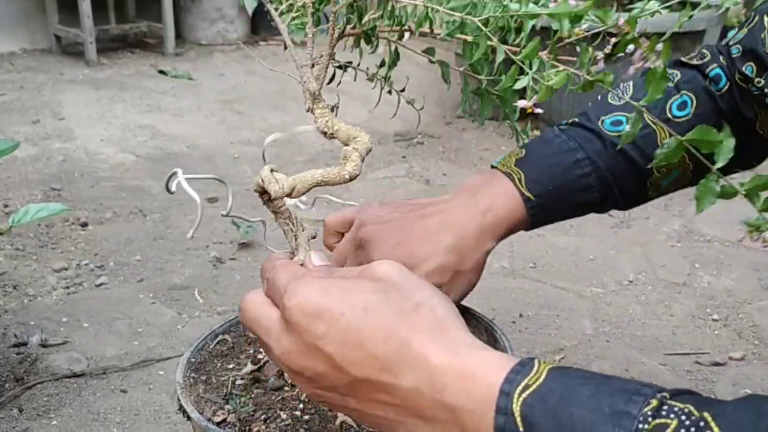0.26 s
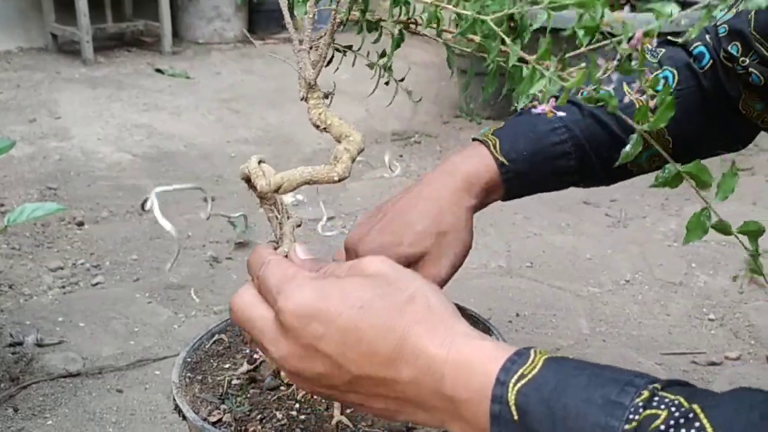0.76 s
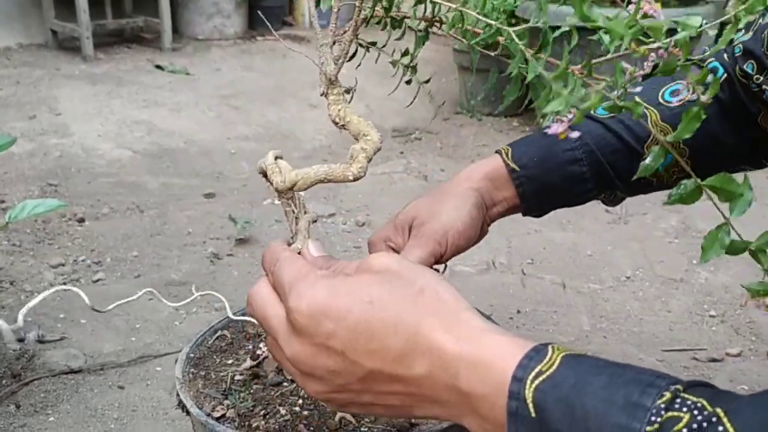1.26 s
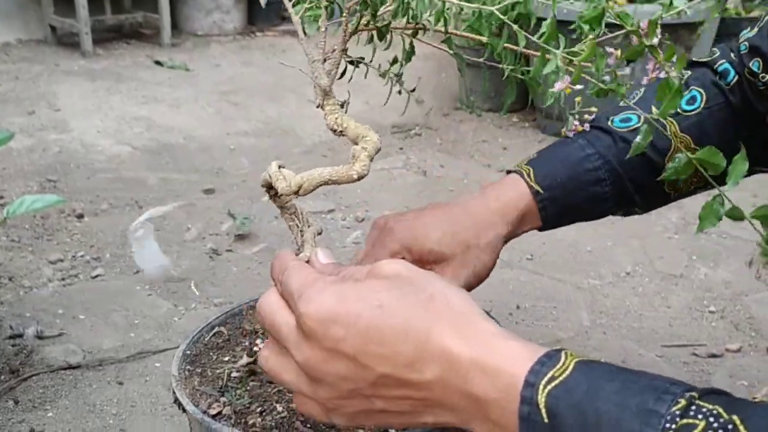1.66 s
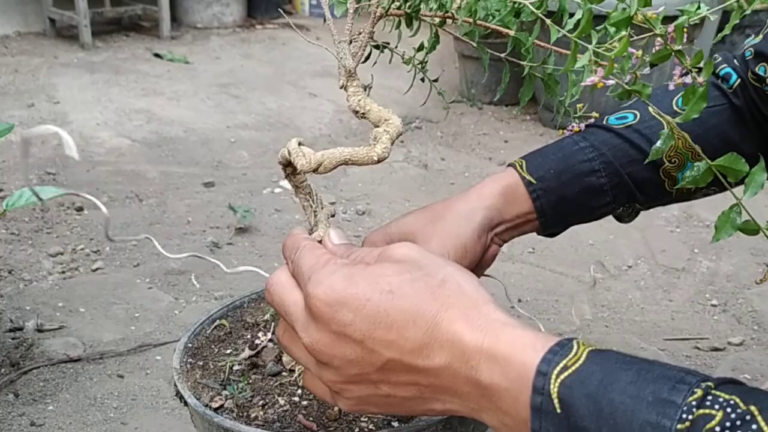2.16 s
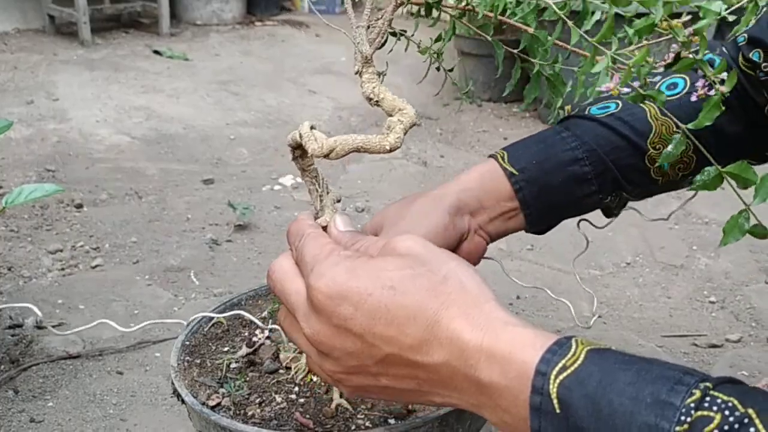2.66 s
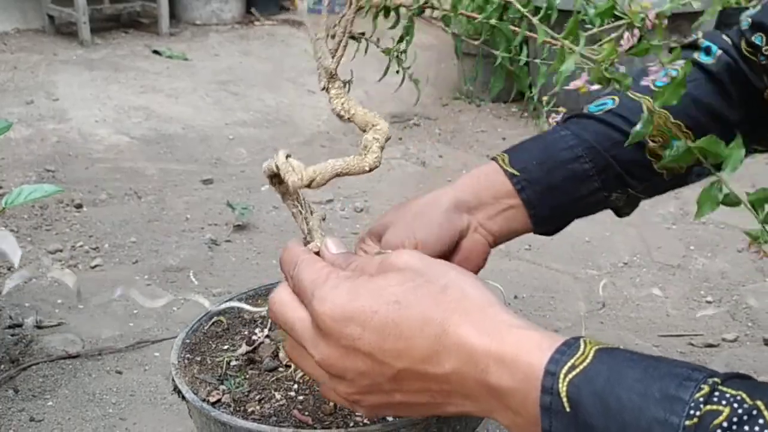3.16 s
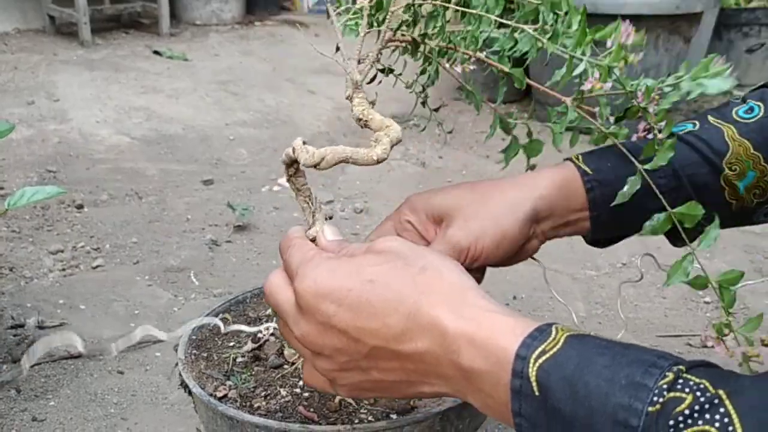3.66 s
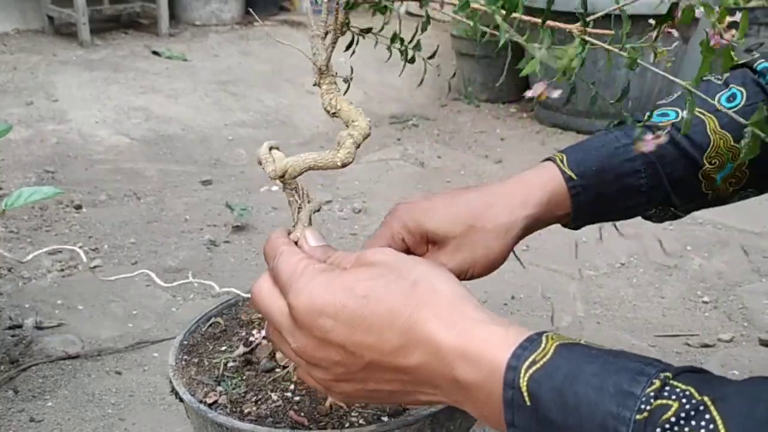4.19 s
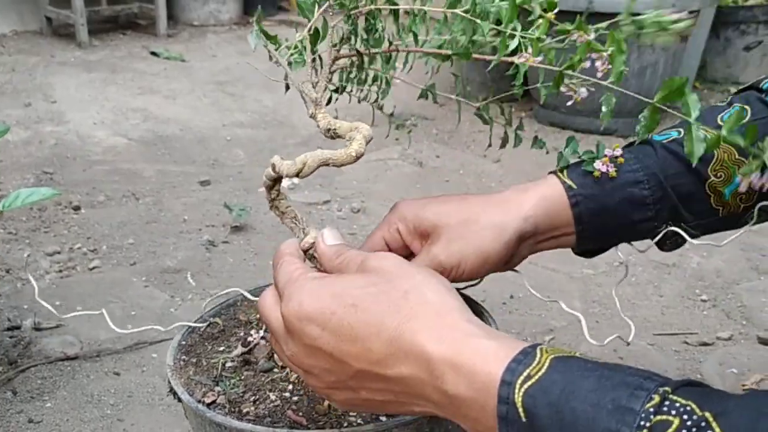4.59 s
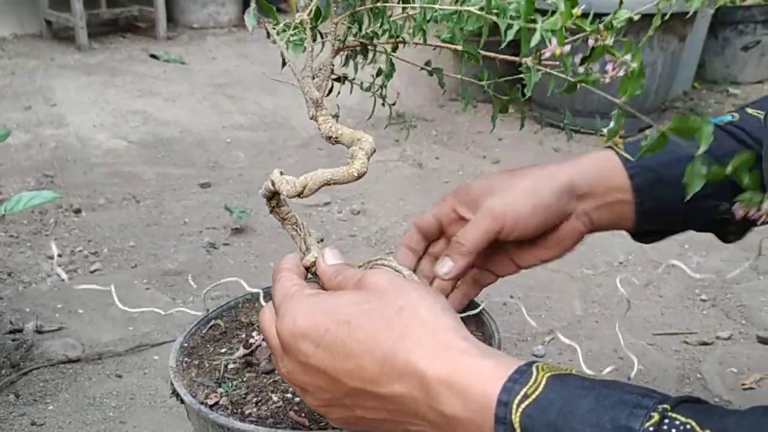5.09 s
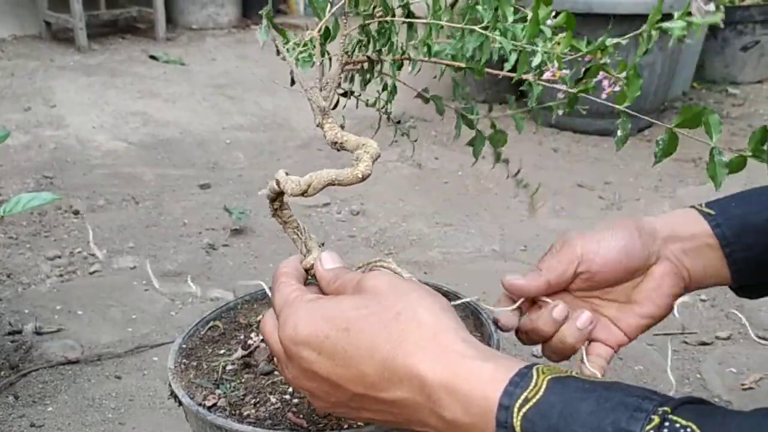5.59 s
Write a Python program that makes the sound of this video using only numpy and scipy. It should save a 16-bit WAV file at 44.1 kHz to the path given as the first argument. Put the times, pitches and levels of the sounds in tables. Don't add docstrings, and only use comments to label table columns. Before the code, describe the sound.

In a walled yard with a soft low hum and airy hiss, a close bird on the right whistles once, sharp and high. A farther bird answers with rising notes, then rapidly alternates falling slides and held whistles, ringing off the walls. After it stops, wire or twig ticks and light leaf rustles come closer together, mostly on the right. Phone-like stereo sound, with slightly dulled, patchy treble.

```python
import sys
import numpy as np
from scipy import signal
from scipy.fft import rfft, irfft, next_fast_len
from scipy.io import wavfile
from scipy.ndimage import map_coordinates

SR = 44100
rng = np.random.default_rng(int(sys.argv[2]) if len(sys.argv) > 2 else 0)


def undo_db(level):
    steps = np.asarray(level, float) / 20
    return 10 ** steps


def file_out(sig):
    cols = np.atleast_2d(sig).T
    lim = np.clip(cols, -1, 1)
    pcm = np.round(lim * 32767).astype(np.int16)
    wavfile.write(sys.argv[1], SR, pcm)


N = 257544


def unit(x):
    return x / np.sqrt(np.mean(x ** 2) + 1e-20)


def along(points, hz):
    f, v = np.transpose(points)
    return np.interp(np.log(hz + 1), np.log(f + 1), v)


def wobble(rate, size=N):
    knots = rng.standard_normal(int(size * rate / SR) + 4)
    return map_coordinates(knots, [np.arange(size) * rate / SR])


def filtered(x, response):
    m = next_fast_len(N + SR // 2)
    return irfft(rfft(x, m) * response(np.fft.rfftfreq(m, 1 / SR)), m)[..., :N]


def sides(lean_db):
    return undo_db(np.array([np.minimum(lean_db, 0), np.minimum(-lean_db, 0)]))


def rush(spectrum, alike):
    def middle_and_side(hz):
        turn = np.arccos(np.clip(along(alike, hz), -1, 1)) / 2
        return undo_db(along(spectrum, hz)) * [np.cos(turn), np.sin(turn)]
    mid, side = filtered(rng.standard_normal((2, N)), middle_and_side)
    return unit(np.array([mid + side, mid - side]))


# f/Hz, decay by 60 dB t/s
YARD_DECAY = [(1000, 0.16), (2500, 0.51), (5500, 0.33), (12000, 0.22)]


def walls(x, delay_s):
    hz, t, z = signal.stft(rng.standard_normal((2, SR * 3 // 4)), SR, nperseg=256)
    decay = undo_db(-60 * t / along(YARD_DECAY, hz)[:, None])
    tail = signal.istft(z * decay, SR, nperseg=256)[1]
    tail = tail / np.linalg.norm(tail[0])
    tail = np.pad(tail, ((0, 0), (round(delay_s * SR), 0)))
    return signal.fftconvolve(np.atleast_2d(x), tail, axes=1)[:, :N]


def glides(events, shape):
    when, glide, under_db = np.transpose(shape)
    return [np.transpose([start + when * length, f0 + glide * (f1 - f0), peak_db + under_db])
            for start, length, f0, f1, peak_db in events]


HOARSE_S = 0.11
BRIGHTENS = 0.26
PINCHED = 0.41


def syrinx(notes, beak, drift, flutter_db, breath_db, rasp, hoarse_db):
    out = np.zeros(N)
    for points in notes:
        s, hz, db = np.transpose(points)
        at = np.arange(round(s[0] * SR), round(s[-1] * SR))
        size = len(at)
        note_db = np.interp(at / SR, s, db)
        pitch = np.interp(at / SR, s, hz) * (1 + drift * wobble(87.6, size))
        phase = 2 * np.pi * np.cumsum(pitch) / SR

        k = np.arange(2, 13)[:, None]
        effort_db = np.where(k > 2, BRIGHTENS, -PINCHED) * (note_db - db.max())
        overtone_gain = undo_db(along(beak, k * pitch) + effort_db) * (k * pitch < 15800)
        overtones = (overtone_gain * np.sin(k * phase)).sum(0)

        hoarse = undo_db(hoarse_db * np.exp(-(at / SR - s[0]) / HOARSE_S))
        turbulence = wobble(700, size) + 0.54 * wobble(4000, size)
        overtones *= 1 + rasp * hoarse * turbulence
        halo = hoarse * undo_db(breath_db) * wobble(2400, size)

        level = undo_db(note_db + 5.0 + flutter_db * wobble(96.8, size))
        fade = signal.windows.tukey(size, .08)
        out[at] += level * fade * ((1 + halo) * np.sin(phase) + overtones)
    return out


# t/share of length, f/share of glide, level/dB under the peak
RISE_SHAPE = [(0, 0, -25.5), (0.331, .45, -9.5), (.62, .9, -0.5), (.85, 1, -4.5), (1, 1.2, -36.5)]
SLIDE_SHAPE = [(0, 0.0047, -11), (.24, .14, 2), (0.499, .62, -0.5), (.85, .97, -4.5), (1, 1, -21)]
HOLD_SHAPE = [(0, 0, -23), (.2, .15, -4), (.57, .4, -7.5), (.82, .7, -12.5), (1, 0.76, -17.5)]
# start t/s, length t/s, from f/Hz, to f/Hz, peak level/dB
RISES = [
    (1.605, .205, 1415, 1899, -25.5),
    (1.92, 0.17, 1963, 2110, -22),
    (2.51, .1, 1990, 2290, -21.5),
]
SLIDES = [(2.30, 0.16, 2130, 1398, -26), (2.67, .1, 1890, 1405, -26), (2.975, 0.11, 1826, 1250, -26.5),
          (3.29, 0.1, 1940, 1397, -23.5), (3.61, .1, 1841, 1131, -26), (3.78, .07, 1747, 1342, -24.5)]
HOLDS = [(2.585, 0.0822, 2303, 2194, -24), (2.815, 0.13, 2296, 2166, -18.5), (3.115, 0.12, 2245, 2229, -18),
         (3.435, .15, 2375, 2167, -19.5)]
LAST_NOTE = [(3.825, .16, 1290, 1173, -27.5)]
# f/Hz, level/dB
FAR_BEAK = [(2400, -18.5), (3000, -20.5), (3600, -36.5), (4500, -30), (6000, -24.5), (9000, -26.5),
            (11000, -17), (11900, -34), (12500, -46), (14600, -41), (15800, -32)]
# f/Hz, left minus right level/dB
FAR_ECHO_LEAN = [(1200, 16.5), (1700, -12), (2000, 1.5), (2250, -12), (4000, -24), (10000, 3.5)]
# f/Hz, left level/dB, right level/dB
FAR_DIRECT = [(1250, -25.5, -12.5), (1780, 1.5, -19.5), (1760, -7.5, -8.5), (2244, -17, 6),
              (2530, -33, -1.5), (10300, -16, -12)]


def far_bird():
    whistles = syrinx(glides(RISES, RISE_SHAPE) + glides(HOLDS, HOLD_SHAPE), FAR_BEAK, drift=0.004,
                      flutter_db=3.0, breath_db=-25.5, rasp=0.4, hoarse_db=-3.5)
    rough = syrinx(glides(SLIDES, SLIDE_SHAPE) + glides(LAST_NOTE, HOLD_SHAPE), FAR_BEAK, drift=0.0042,
                   flutter_db=2.5, breath_db=-30.5, rasp=0.65, hoarse_db=-1.5)
    song = whistles + rough
    shimmer = undo_db(1.42 * np.array([wobble(40), wobble(40)]))
    echoes = undo_db(-1.5) * shimmer * walls(song, .004)
    echoes = filtered(echoes, lambda hz: sides(along(FAR_ECHO_LEAN, hz)))
    paths = np.array(FAR_DIRECT)
    direct = filtered(song, lambda hz: undo_db([along(paths[:, [0, side]], hz) for side in (1, 2)]))
    return direct + echoes


# t/s, f/Hz, level/dB
NEAR_WHISTLE = [
    [(1.052, 4310, -35.5), (1.07, 4600, -18.5), (1.095, 4646, -18), (1.113, 5034, -13.5),
     (1.17, 5234, -11.5), (1.205, 5106, -17), (1.24, 5344, -11), (1.258, 5300, -20), (1.27, 4950, -9)],
    [(1.064, 4045, -26), (1.072, 3930, -31), (1.09, 4360, -29), (1.112, 4305, -24), (1.122, 4440, -42.5)],
]
# start t/s, length t/s, from f/Hz, to f/Hz, peak level/dB
SOFT_NOTES = [
    (.33, .23, 3800, 3920, -47.5),
    (.285, 0.053, 2400, 3350, -53.5),
]
# t/share of length, f/share of glide, level/dB under the peak
FADE_SHAPE = [(0, 0, 3), (.1, 1, -5), (.6, .9, -9), (1, 0.96, -18)]
# f/Hz, level/dB
NEAR_BEAK = [(8000, -25), (10500, -45), (13000, -34), (15500, -40)]
# f/Hz, left minus right level/dB
NEAR_LEAN = [(3800, -29), (5200, -30.5), (10000, -13), (15500, -18.5)]
# f/Hz, level/dB
NEAR_SCATTER = [(5500, 0.5), (8000, 16.5), (15000, 10)]


def near_bird():
    call = syrinx(NEAR_WHISTLE + glides(SOFT_NOTES, FADE_SHAPE), NEAR_BEAK, drift=0.0067,
                  flutter_db=1.8, breath_db=-39.5, rasp=0.18, hoarse_db=19.5)
    direct = filtered(call, lambda hz: sides(along(NEAR_LEAN, hz)))
    scattered = filtered(call, lambda hz: undo_db(along(NEAR_SCATTER, hz)))
    return direct + undo_db([[-21], [-19]]) * walls(scattered, .012)


# t/s, peak level/dB, centre f/Hz, left minus right level/dB
TICKS = [(0.362, -46.5, 1470, -3), (2.1131, -32.5, 4080, -29.5), (2.1323, -48, 10400, -3),
         (2.307, -43, 4370, -17), (2.699, -52, 10300, -5), (3.238, -26.5, 7900, -4),
         (4.0507, -39.5, 5430, -21), (4.1476, -39.5, 3520, -21), (4.2084, -47, 5800, -13),
         (4.225, -83, 2796, -9), (4.2502, -36, 3560, -24), (4.285, -35, 3100, -30),
         (4.3177, -27.5, 8300, 11), (4.387, -45, 2860, -17), (4.6832, -35.5, 4200, -25),
         (4.9186, -38, 2820, -21), (5.1862, -34.5, 4500, -18), (5.208, -38, 3040, -34),
         (5.288, -36, 3303, -26), (5.3368, -57, 6760, -7), (5.3594, -54, 3180, -9), (5.41, -52, 3410, -11),
         (5.4394, -49, 4430, -10), (5.4972, -28.5, 2900, -23), (5.5585, -34, 2970, -24),
         (5.778, -41.5, 7600, -6)]


def ticks():
    out = np.zeros((2, N + SR))
    t = np.arange(SR // 50) / SR
    for s, db, hz, lean_db in TICKS:
        crack = undo_db(-60 * t / .007) * rng.standard_normal(len(t))
        band = [0.58 * hz, min(1.24 * hz, 15000)]
        ring = signal.sosfilt(signal.butter(2, band, "bandpass", fs=SR, output="sos"), crack)
        ring = ring / np.abs(ring).max()
        out[:, round(s * SR):][:, :len(t)] += undo_db(db + 5.0) * sides(lean_db)[:, None] * ring
    return out[:, :N]


# t/s, half length t/s, level/dB
RUSTLES = [(1.524, 0.044, -75), (1.675, 0.074, -61), (3.247, 0.03, -51.5), (3.967, 0.098, -62),
           (4.728, 0.034, -68), (5.296, 0.022, -58), (5.341, 0.011, -58.5), (5.435, 0.021, -54),
           (5.507, 0.017, -56.5)]
# f/Hz, level/dB per Hz
LEAF_COLOUR = [(410, -4), (700, -6), (1340, -4), (2510, -6.5), (2940, -9), (7710, -9), (13500, -35.5),
               (15800, -48)]
BRUSH_FALL_DB = 2.5
FIDGET_FROM_S, FIDGET_DB, FIDGET_DB_PER_S = 4.1, -67, 5


def rustles():
    clock = np.arange(N) / SR
    effort = sum(undo_db(db - BRUSH_FALL_DB * ((clock - s) / half) ** 2) for s, half, db in RUSTLES)
    since = clock - FIDGET_FROM_S
    effort = effort + (since > 0) * undo_db(FIDGET_DB + FIDGET_DB_PER_S * since)
    spikes = undo_db(1.6 * wobble(60) + 2.2 * wobble(500))
    grains = unit(spikes * rush(LEAF_COLOUR, [(1000, .5), (8000, 0.122)]))
    return undo_db(4.5) * effort * grains


def hands():
    snaps = ticks()
    return snaps + walls(snaps, 0.004) / 4 + rustles()


PASS_S = 6.17


def nearness():
    return -20 * np.log10(np.maximum(1 - np.arange(N) / SR / PASS_S, .02))


# t/s, level/dB
ENGINE_LOAD = [(0, -48.5), (1.19, -51.5), (3.8, -52), (4.0, -52), (4.3, -46.5), (5.2, -45), (5.5, -42.5),
               (5.84, -48)]
# f/multiple of the firing rate, level/dB
EXHAUST_ORDERS = [(.5, -11), (1, -5), (1.5, -16), (2, -4.5), (3, 0), (4, -2.5), (5, -18.5), (6, -16)]
# f/Hz, likeness 0-1
LIKENESS = [(25, 0.74), (125, 1), (300, 1), (600, 1), (1200, 0.44), (4000, 0.032)]
FIRING_HZ = 56.3
RUMBLE_DB, RUMBLE_GROWS = -63, 0.82


def engine():
    drone_db = np.interp(np.arange(N) / SR, *np.transpose(ENGINE_LOAD))
    phase = 2 * np.pi * FIRING_HZ * np.arange(N) / SR
    lines = sum(undo_db(db + 3.1 * wobble(7.1)) * np.sin(k * phase + 1.07 * wobble(8))
                for k, db in EXHAUST_ORDERS)
    drone = undo_db(drone_db - 3.0) * unit(lines) * undo_db(0) * 1.0
    drone = drone * undo_db([[.7], [-.7]])
    rumble = rush([(15, -20.5), (32, 4.5), (60, 1), (110, -3), (200, -48.5)], LIKENESS)
    rumble_db = RUMBLE_DB + RUMBLE_GROWS * nearness() + 3.1 * wobble(0.5)
    return drone + undo_db(rumble_db - 8.5) * rumble


# start t/s, length t/s, from f/Hz, to f/Hz, peak level/dB
DISTANT_CALLS = [
    (.13, .12, 2250, 2000, -60),
    (.8, .14, 1850, 2000, -63.5),
    (.492, 0.027, 7500, 6100, -47),
    (1.8, .03, 12000, 16000, -44),
    (1.8, 0.011, 4700, 5500, -60),
]


def distant_birds():
    calls = syrinx(glides(DISTANT_CALLS, HOLD_SHAPE), [(3000, -43)], drift=.012,
                   flutter_db=5.5, breath_db=-6, rasp=0.35, hoarse_db=-1)
    return walls(calls, 0.0026)


# f/Hz, level/dB per Hz
AIR_COLOUR = [(20, -5.5), (110, -9.5), (220, -8.5), (365, -17.5), (540, -14.5), (700, -22), (1500, -22.5),
              (3500, -27.5), (7000, -28), (9200, -30), (10200, -37), (15800, -44.5)]
AIR_DB, AIR_GROWS = -51, 0.068


def town_air():
    air_db = AIR_DB + AIR_GROWS * nearness() + wobble(3.0) / 2
    return undo_db(air_db) * rush(AIR_COLOUR, LIKENESS)


def scene():
    birds = far_bird() + near_bird() + distant_birds()
    town = engine() + town_air()
    town[0] = np.roll(town[0], 14)
    return birds + town + hands()


# f/Hz, margin level/dB over its quiet level, share of loudness
THRIFT = [(2500, -30, 0), (5040, -5, .03), (8500, -2, .08), (9800, -1.3, .1), (11400, -1, .2),
          (12000, -1.2, 0.8), (13600, -1.3, .6), (14650, -1.3, 0.45), (15300, .5, .9)]


def thrifty(x, near_db, above_db, below_db):
    hz, _, z = signal.stft(x, SR, "cosine", nperseg=2048)
    bands = z[:, :-1].reshape(2, 128, 8, -1)
    level = 10 * np.log10(np.mean(np.abs(bands) ** 2, axis=(0, 2))[None] + 1e-16)
    loud = level[:, 6:].max(axis=1, keepdims=True)
    loud = np.maximum(loud - np.median(loud) - 6, 0)
    centre, rule = hz[4::8], np.array(THRIFT)
    margin, share = [along(rule[:, [0, col]], centre)[:, None] for col in (1, 2)]
    faint = np.percentile(level, 30, axis=2, keepdims=True) + margin + share * loud
    apart = np.arange(128)[:, None] - np.arange(128)
    skirt = near_db + np.where(apart > 0, above_db * apart, -below_db * apart)
    hidden = (level[:, None] - skirt[None, :, :, None]).max(axis=2)
    z[:, :-1] *= np.repeat(level > np.maximum(faint, hidden), 8, axis=1)
    return signal.istft(z, SR, "cosine", nperseg=2048)[1][:, :N]


def roll_off(x):
    return signal.sosfilt(signal.butter(12, 16390, fs=SR, output="sos"), x)


def record(dry):
    heard = filtered(dry, lambda hz: hz < 15830)
    phone = thrifty(heard, near_db=42.5, above_db=0.65, below_db=7)
    return roll_off(phone)


dry = scene()
out = record(dry)
file_out(out)
```